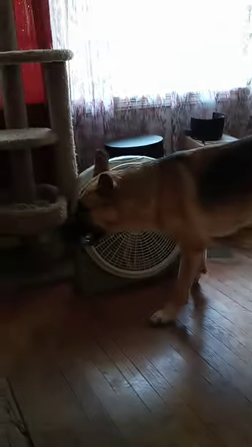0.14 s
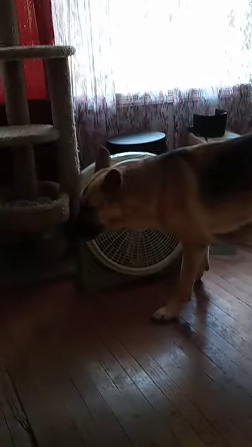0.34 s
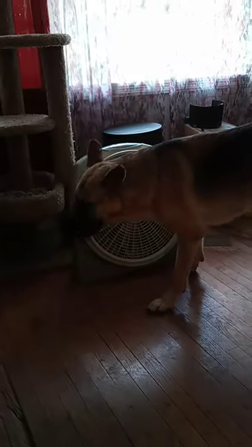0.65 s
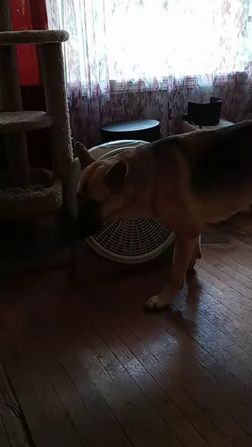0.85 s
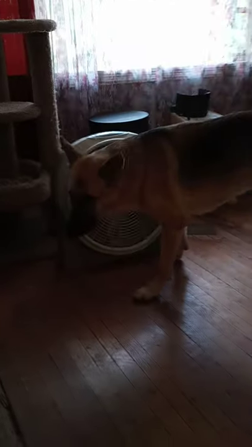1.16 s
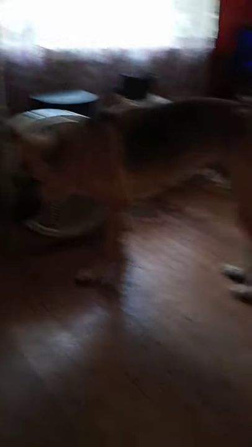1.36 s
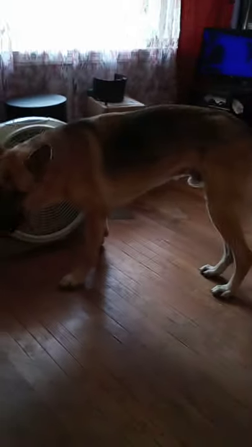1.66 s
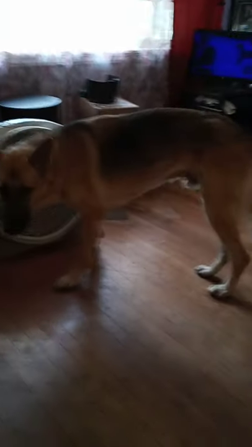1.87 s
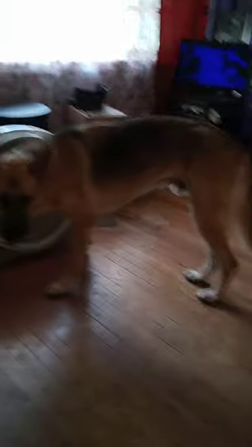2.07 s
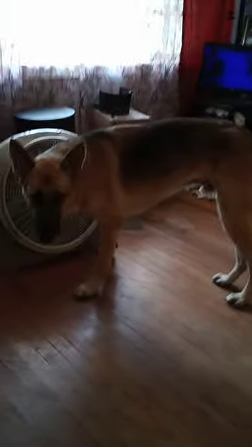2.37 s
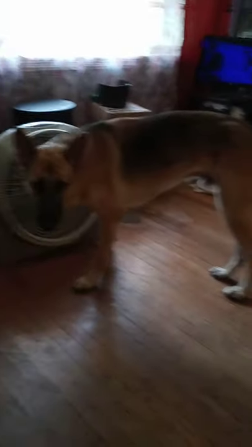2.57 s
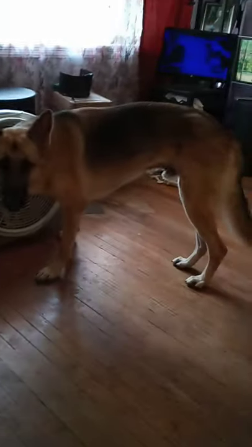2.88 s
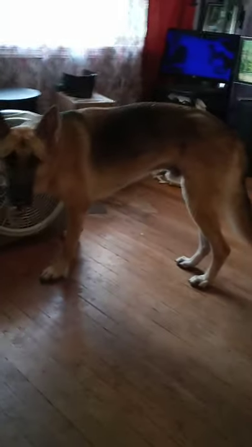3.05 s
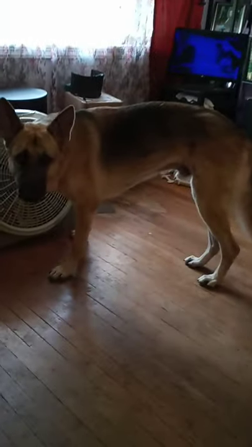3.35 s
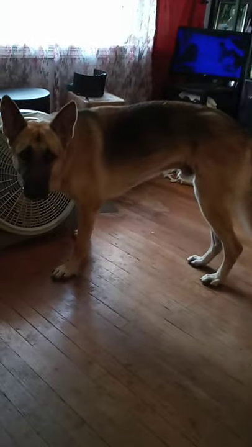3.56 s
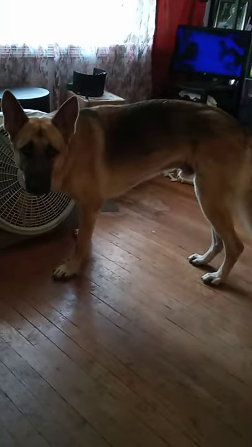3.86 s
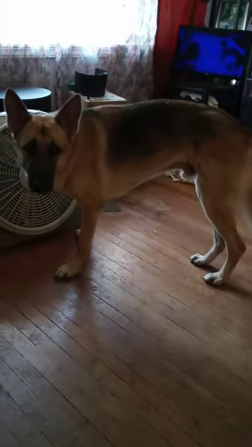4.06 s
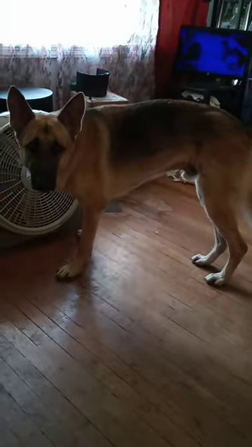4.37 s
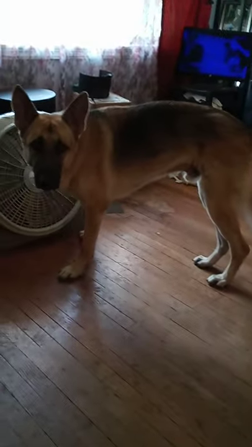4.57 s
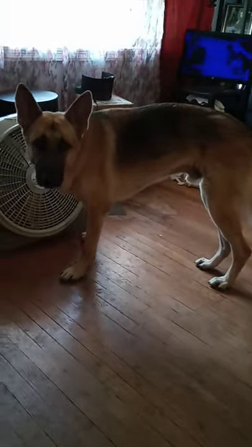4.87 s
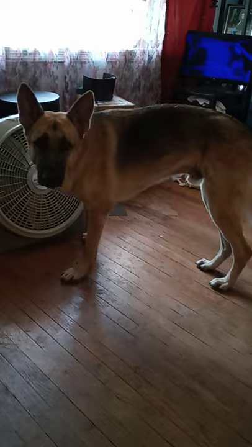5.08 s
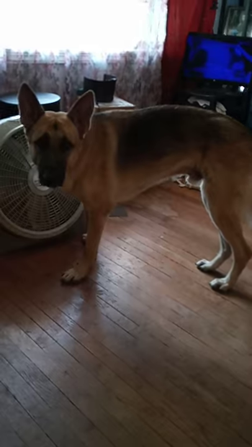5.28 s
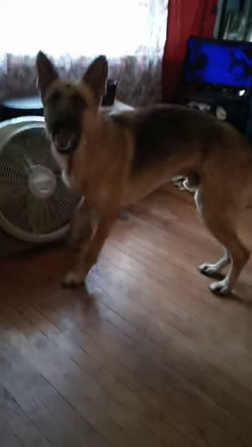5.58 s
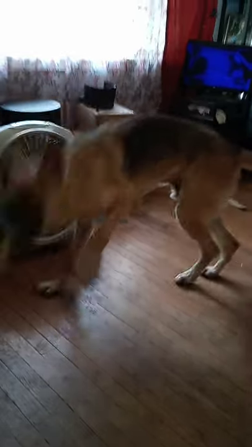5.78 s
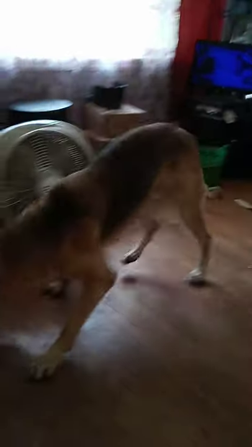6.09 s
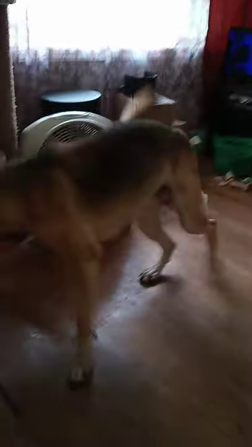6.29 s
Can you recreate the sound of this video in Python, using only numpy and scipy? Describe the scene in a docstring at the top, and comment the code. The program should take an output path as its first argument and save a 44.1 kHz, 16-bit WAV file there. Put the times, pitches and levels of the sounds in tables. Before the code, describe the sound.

A large dog moves on a hardwood floor in a small, lively room, heard through a phone microphone over a low household rumble, faint hiss and a soft, swelling rustle. Sharp claw clicks come in quick clusters at about 0.4 and 0.8 seconds. Lighter taps, scuffs and faint pad rubs follow between 1 and 2.7 seconds. At about 2.8 seconds something like a geared plastic toy stutters twice, then whirs with a raspy buzz until 3.5 seconds, speeding up and running down. A couple of light taps and a soft step come near 3.8 seconds, then a lull. The toy gives very short bursts at 5.4 and 5.8 seconds. Just after 6 seconds the dog pounces: loud paw thumps make the boards boom, with sharp claw clicks, followed by smaller thumps and a scuff around 6.3 seconds as the rustle grows.

```python
"""Dog and geared toy on a hardwood floor

A large dog shifts about in a small, lively room, heard through a phone microphone. Its claws click and
scuff on the boards, its pads rub, and its paws thump the floor as it pounces. Something like a geared
plastic toy whirs in one long run and a few short bursts. A low household rumble, a faint hiss and a
soft, swelling rustle lie underneath."""
import sys
import numpy as np
from scipy import signal
from scipy.fft import rfft, irfft
from scipy.io import wavfile
from scipy.ndimage import uniform_filter1d

SR = 44100
rng = np.random.default_rng(int(sys.argv[2]) if len(sys.argv) > 2 else 0)


def inscribe(sig):
    """Save sig as 16-bit PCM at rate SR to the path in sys.argv[1].

    A 1-D sig is mono; a 2-D sig holds one channel per row.
    Samples are clipped to [-1, 1] before scaling.
    """
    pcm = np.round(np.clip(np.atleast_2d(sig).T, -1, 1) * 32767)
    wavfile.write(sys.argv[1], SR, pcm.astype(np.int16))


N = 283563
TIME = np.arange(N) / SR
# Claws striking the boards. Each row: start in seconds, attack level in dB, low knock in dB,
# high snap in dB.
CLAW_STRIKES = [(0.3608, -17.5, -17, 4), (0.3911, -20, -10, 10), (0.428, -25, 6.5, 5),
                (.7507, -39, -12, 9.5), (0.7885, -20, 2, 10), (.802, -35, 14, -1), (1.281, -30.5, 6, -2),
                (1.3, -38.5, 11, -12), (1.658, -40.5, -2, -10), (1.671, -37, -18, -2), (1.734, -44, -9, 16),
                (1.754, -39.5, -5, 30), (2.2421, -25, -40, 26), (2.283, -34.5, 9, 31),
                (2.304, -40.5, -13, 13), (2.6887, -39, -15, 28), (2.7295, -35.5, -8, 16),
                (3.823, -39, -30, -5), (3.8724, -37.5, -1, -22), (5.778, -36, 12, -16), (6.029, -18, 15, 5),
                (6.054, -25.5, 28.5, -30), (6.2833, -34.5, 28, 30), (6.36, -25.5, 10.5, -30)]


def claw_clicks(walls, chatter_t60=0.022, tick=2.4, chatter=0.58, absorbed_db=-7):
    """A hard claw tip strikes and chatters for a moment; the boards ring, and a few pings linger."""
    # High modes of the boards. Each row: frequency in Hz, relative level in dB, t60 in seconds.
    tap_modes = [(860, 13, 0.035), (1040, 8, 0.035), (1640, 14, 0.26), (2146, 7.5, 0.12),
                 (2243, 11.5, 0.17), (3090, 10, 0.18), (3800, 8, .03), (4030, 6, 0.019), (6820, 0, 0.053),
                 (7100, -14, 0.07)]
    # Small ringing ticks. Each row: start in seconds, frequency in Hz, level in dB, t60 in seconds.
    pings = [(1.29, 588, -54, 0.46), (3.53, 560, -57, 1), (3.824, 2630, -43, 0.59), (3.825, 4070, -47, 0.2),
             (3.901, 1136, -55, 0.2)]
    out, t = np.zeros(N), TIME[:len(walls)]
    attack_samples = SR // 500  # about 2 ms
    for start, db, knock_db, snap_db in CLAW_STRIKES:
        contact = rng.standard_normal(len(t)) * fade(t, chatter_t60)
        contact[0] += tick
        direct = unit_energy(convolve(contact, tap_response(knock_db, snap_db)))
        # the strike and its chatter both reach the walls, which swallow the top
        echo = convolve(walls, tap_response(knock_db, snap_db + absorbed_db))
        tail = unit_energy(echo + chatter * convolve(echo, unit_energy(contact)))
        room_gain = undb(5.5 + 0.17 * knock_db)  # more knock, more reverberation
        add(out, start, undb(db) * np.sqrt(attack_samples) * (direct + room_gain * tail))
    out = resonate(out, tap_modes, ring_db=0.5)
    for start, hz, db, t60 in pings:
        add(out, start, undb(db) * np.sin(2 * np.pi * hz * t) * fade(t, t60))
    return out


def tap_response(knock_db, snap_db=0):
    """Colour of a hard contact with the boards, with more or less low knock and high snap."""
    # Spectrum of claw on wood. Each row: frequency in Hz, relative level in dB.
    claw_colour = [(300, -19), (700, -24), (1100, -18.5), (1750, -7), (2400, -2), (3000, -3), (4000, -2.5),
                   (5200, -12), (7100, -2.5), (8500, -7), (10200, -12.5), (12000, -23.5), (15500, -21.5)]
    hz, db = np.transpose(claw_colour)
    knock_share = lookup([(1600, 0.7), (2500, 0.086)], hz)
    snap_share = lookup([(6500, 0.31), (13000, 0.73)], hz)
    return response(np.c_[hz, db + knock_share * knock_db + snap_share * snap_db])


def paw_thumps(walls, gain_db=31, room_db=-3, thud_db=-4):
    """Soft pads push on the boards, which boom in their low modes over a dull thud."""
    # The dog's weight landing. Each row: start in seconds, relative level in dB, contact in seconds.
    landings = [(.43, -53, .0005), (1.283, -44.5, 0.00028), (1.47, -48.5, 0.00039), (2.331, -50, 0.00066),
                (3.815, -43, 0.0044), (5.846, -35.5, 0.0043), (6.055, -19, 0.0017), (6.071, -19, 0.0027),
                (6.284, -27.5, 0.015), (6.356, -38, 0.0069)]
    # Low modes of the boards. Each row: frequency in Hz, relative level in dB, t60 in seconds.
    board_modes = [(82, -22.5, 0.21), (133.5, -5, 0.15), (158.2, -2.5, 0.42), (182, -3.5, 0.088),
                   (233, -4, 0.17), (278.7, -0.5, 0.26), (350.8, -4, 0.23), (480, -8, 0.1)]
    out, t = np.zeros(N), TIME[:SR // 2]
    boom = unit_energy(sum((-1) ** k * undb(db) * np.sin(2 * np.pi * hz * t) * fade(t, t60)
                           for k, (hz, db, t60) in enumerate(board_modes)))
    thud_colour = response([(40, -14.5), (100, -2), (280, 3.5), (500, 0.5), (800, -13.5),
                            (2000, -25), (6000, -77)])
    for start, db, contact_s in landings:
        thud = unit_energy(convolve(rng.standard_normal(len(t)) * fade(t, t60=0.36), thud_colour))
        body = boom + undb(thud_db) * thud
        push = np.exp(-np.pi * t / contact_s)  # a longer contact sounds duller
        add(out, start, undb(db + gain_db) * unit_energy(convolve(body, push)))
    return out + undb(room_db) * convolve(out, walls)


def toy_gears(walls, teeth=8, mesh_hz=76.8, slip_range_hz=4.5, slip_s=0.0015, buzz_db=-4, rasp_db=-4):
    """Teeth tick in the same uneven pattern on every turn; when they slip, the buzz turns to a rasp."""
    # Colour of the plastic shell. Each row: frequency in Hz, relative level in dB.
    shell_colour = [(80, -14.5), (150, -10), (300, -5.5), (450, -8.5), (650, -8), (1000, -10), (1500, -8.5),
                    (2100, -1), (3100, -4.5), (3900, -2), (5500, -7.5), (7300, -1), (8700, -5.5),
                    (10000, -12.5), (12500, -17), (15500, -18.5)]
    # Resonances of the shell. Each row: frequency in Hz, relative level in dB, t60 in seconds.
    shell_modes = [(472, 1, .07), (940, 1, .07), (1020, 2, .07), (1831, 5, .15), (2048, 0, .1),
                   (2113, 1, .12), (2275, 4, .07), (2613, 4, .12), (2907, 2, .1), (3620, 0, .025),
                   (4108, 3, .06), (4950, 3, .025), (5102, 2, .1), (5660, -3, .02), (6390, -1, .03),
                   (7095, 9, .4), (7168, 14.5, .3), (7200, 4, .08), (7410, 2, .04), (8420, 2, .02),
                   (11500, 6, .015), (13750, 4, .02), (14150, 3, .02), (14700, 2, .03)]
    speed, drive = gear_motion(mesh_hz)
    slip = np.clip((mesh_hz - speed) / slip_range_hz, 0, 1)  # the teeth mesh cleanly above mesh_hz
    turns = np.cumsum(speed) / SR
    tooth_place = rng.random(teeth)
    tooth_force = undb(2 * rng.standard_normal(teeth))
    tooth_force[0] *= 3.7  # one tooth catches harder than the rest
    tick_s = np.interp(np.arange(int(turns[-1]))[:, None] + tooth_place, turns, TIME)
    tick_s += slip_s * np.interp(tick_s, TIME, slip) * rng.standard_normal(tick_s.shape)
    tick_force = tooth_force * undb(0.5 * rng.standard_normal(tick_s.shape))
    tick_index = np.clip(tick_s * SR, 0, N - 1).astype(int)
    ticks = np.bincount(tick_index.ravel(), tick_force.ravel(), N)
    # the ticks carry the pitch in the lows and mids
    buzz = butterworth(unit(ticks - ticks.mean()), 1, 4500, "low") * np.sqrt(2)
    # each tooth scrapes as it lets go, which fills the treble
    scrape = unit(convolve(ticks, fade(TIME[:SR // 50], t60=0.024))) * rng.standard_normal(N)
    rasp = butterworth(scrape, 2, 2600, "high")
    whir = drive * (undb(buzz_db) * buzz + undb(rasp_db) * rasp)
    coloured = convolve(whir, response(shell_colour))
    return in_room(resonate(coloured, shell_modes, ring_db=2), walls)


def gear_motion(mesh_hz, peak_share=0.41, sag_hz_per_s2=100, db_per_hz=0.16,
                attack_s=0.0086, release_s=0.012):
    """Speed and strength of the gears: each run spins up and runs down in an arch, louder when faster."""
    # Runs of the toy. Each row: start and length in seconds, relative level in dB,
    # top speed in turns per second.
    runs = [(2.765, .03, -27, 58.2), (2.826, 0.029, -25, 64.05), (2.874, .618, -25.5, 78.88),
            (5.37, 0.031, -23.5, 62.02), (5.809, 0.13, -25, 67.77)]
    speed, drive = np.full(N, float(mesh_hz)), np.zeros(N)
    for start, length, db, top_hz in runs:
        t = TIME - start
        gate = np.clip(t / attack_s, 0, 1) * np.clip((length - t) / release_s + 0.5, 0, 1)
        sag_hz = sag_hz_per_s2 * (t - peak_share * length) ** 2
        speed = np.where(gate > 0, top_hz - sag_hz, speed)
        drive += gate * undb(db - db_per_hz * sag_hz)
    return speed, drive


def claw_scuffs(walls, grain_db=3):
    """Sliding claws catch and slip in dense, uneven grains."""
    # Claw slides, some alone and some leading into a strike. Each row: start and length in seconds,
    # relative level in dB, knock in dB.
    slides = [(0, 0.01, -36, 11.5), (0.327, 0.047, -38.5, 0), (1.216, 0.036, -51, -2),
              (5.616, 0.089, -51.5, 15.5), (6.32, .095, -41.5, 14)]
    dry = np.zeros(N)
    grains = unit(rng.standard_normal(N) * undb(grain_db * np.minimum(rng.exponential(size=N), 5)))
    for start, length, db, knock_db in slides + claw_drags():
        slide = slide_envelope(start, length, db, taper=0.3)
        dry += convolve(slide * grains, tap_response(knock_db))
    return in_room(dry, walls)


def claw_drags(lead_s=0.046, length_s=0.098, drag_db=-48, reference_strike_db=-18.5, drag_knock_db=3):
    """A claw slides briefly as it lands; harder and heavier strikes drag more, a thin tick hardly."""
    slides = []
    for start, strike_db, knock_db, _ in CLAW_STRIKES:
        db = drag_db + 0.42 * (strike_db - reference_strike_db) + 0.13 * knock_db
        slides.append((start - lead_s, length_s, db, drag_knock_db))
    return slides


def pad_rubs(walls, width_octaves=0.59):
    """A pad rubs over the wood for a moment and rings one broad resonance."""
    # Soft rubs. Each row: start and length in seconds, centre in Hz, relative level in dB.
    rubs = [(1.008, 0.038, 1590, -56.5), (1.463, 0.027, 1100, -48.5), (2.148, 0.036, 2200, -52),
            (2.392, 0.02, 2090, -54), (5.715, 0.056, 1080, -50)]
    dry = np.zeros(N)
    for start, length, hz, db in rubs:
        edges_hz = hz * 2 ** (np.array([-0.5, 0.5]) * width_octaves)
        friction = unit(butterworth(rng.standard_normal(N), 2, edges_hz, "band"))
        dry += slide_envelope(start, length, db, taper=0.5) * friction
    return in_room(dry, walls)


def room_tone(rumble_db=-49.5, hiss_db=-61.5, waver_db=3, flicker_db=2.5):
    """Low household rumble, wavering low mids, a faint steady hiss and a soft, flickering rustle."""
    # Spectra of the rumble and the hiss. Each row: frequency in Hz, relative level in dB.
    rumble_colour = [(15, -51), (25, -28), (48, -10), (58, -19), (80, 4.5), (108, -4), (160, -2.5),
                     (255, -7.5), (320, -21.5), (430, -24.5), (656, -31), (1400, -36), (1820, -80)]
    hiss_colour = [(710, -42), (1200, -28), (1380, -9), (1860, -14.5), (2070, -5), (2830, -12), (3080, -6),
                   (3980, -3), (4480, -7.5), (5310, -21), (7020, -6), (10100, -15.5), (15500, -17.5)]
    low_mids = np.zeros(N)
    for hz, db in [(330, -0.5), (430, -2), (540, -9.5)]:
        band = [(hz * 0.6, -40), (hz * 0.9, 0), (hz * 1.1, 0), (hz * 1.4, -40), (hz * 4, -90)]
        low_mids += coloured_noise(band) * undb(db + waver_db * waver(count=70))
    rustle = coloured_noise([(1000, -24), (1800, -7), (2600, 5), (4000, -3.5), (5200, -21.5),
                             (7000, -14), (11000, -22)])
    rustle *= undb(flicker_db * waver(count=320))
    rustle_gain, mids_gain = swell_gains()
    rumble = coloured_noise(rumble_colour) * undb(rumble_db)
    hiss = coloured_noise(hiss_colour) * undb(hiss_db)
    return rumble + low_mids * mids_gain + hiss + rustle * rustle_gain


def swell_gains(rustle_rest_db=-69, mids_rest_db=-74.5):
    """Gains of the rustle and of the low mids: a resting level with bell-shaped swells on top."""
    # Soft swells. Each row: middle and half width in seconds, rustle gain in dB, low-mid gain in dB.
    swells = [(1.15, 0.82, -59, -63), (2.549, 0.2, -61, -67.5), (3.7, 0.47, -58, -68.5),
              (4.56, .12, -55, -72), (4.95, 0.35, -60, -64), (6.3, 0.52, -50, -52.5)]
    rustle_power, mids_power = undb(rustle_rest_db) ** 2, undb(mids_rest_db) ** 2
    for middle, half_width, rustle_db, mids_db in swells:
        bell = np.exp(-((TIME - middle) / half_width) ** 2)
        rustle_power += bell * undb(rustle_db) ** 2
        mids_power += bell * undb(mids_db) ** 2
    return np.sqrt(rustle_power), np.sqrt(mids_power)


def room_response(first_echo_s=0.0041, build_s=0.0012, echo_db=2, blur_s=0.037):
    """Distinct early echoes off the near walls thicken into a tail whose treble dies first."""
    # Decay of the room. Each row: frequency in Hz, t60 in seconds.
    decay = [(120, 0.46), (500, 0.31), (1400, 0.4), (3700, 0.39), (7500, .4), (14000, 0.24)]
    t = TIME[:SR * 3 // 4]
    echoes = rng.standard_normal(len(t))
    echoes *= undb(echo_db * np.minimum(rng.exponential(size=len(t)), 5) * np.exp(-t / blur_s))
    echoes /= np.sqrt(uniform_filter1d(echoes ** 2, size=600))
    spectrum, hz = rfft(echoes), np.fft.rfftfreq(len(t), 1 / SR)
    centres = np.transpose(decay)[0]
    tail = np.zeros(len(t))
    for (_, t60), share in zip(decay, np.eye(len(decay))):
        band = irfft(spectrum * lookup(np.c_[centres, share], hz), len(t))
        tail += band * fade(t, t60)
    onset = 1 - np.exp(-np.maximum(t - first_echo_s, 0) / build_s)
    return unit_energy(tail * onset)


def in_room(x, walls, direct_db=-4):
    """What reaches the microphone: the direct sound and its reverberation."""
    return undb(direct_db) * x + convolve(x, walls)


def slide_envelope(start, length, db, taper):
    """Strength of one slide, with soft ends and silence around it."""
    envelope = np.zeros(N)
    add(envelope, start, undb(db) * signal.windows.tukey(int(length * SR), taper))
    return envelope


def resonate(x, modes, ring_db):
    """Add the ringing of (Hz, dB, t60) modes that x excites."""
    t = TIME[:SR // 2]
    ring = sum(undb(db) * np.cos(2 * np.pi * hz * t) * fade(t, t60) / fade(t, t60).sum()
               for hz, db, t60 in modes)
    return x + undb(ring_db) * convolve(x, ring)


def coloured_noise(points):
    """Steady noise of rms 1 with the given (Hz, dB) spectrum."""
    return unit(convolve(rng.standard_normal(N), response(points, size=16384)))


def waver(count):
    """A random curve through count points, with a spread near 1."""
    return np.interp(TIME, np.linspace(0, TIME[-1], count), rng.standard_normal(count))


def response(points, size=2048):
    """Minimum-phase impulse response with the given (Hz, dB) spectrum."""
    gain = undb(lookup(points, np.fft.rfftfreq(size, 1 / SR)))
    cepstrum = irfft(np.log(gain))
    cepstrum[1:size // 2] *= 2
    cepstrum[size // 2 + 1:] = 0
    return unit_energy(irfft(np.exp(rfft(cepstrum))))


def lookup(points, hz):
    """Read (Hz, value) points on a log-frequency axis."""
    point_hz, value = np.transpose(points)
    return np.interp(np.log(np.maximum(hz, 1)), np.log(point_hz), value)


def butterworth(x, order, hz, kind):
    """Low-, high- or band-pass x."""
    return signal.sosfilt(signal.butter(order, hz, kind, fs=SR, output="sos"), x)


def convolve(x, h):
    """Pass x through the response h."""
    return signal.fftconvolve(x, h)[:len(x)]


def fade(t, t60):
    """Exponential decay that loses 60 dB in t60."""
    return np.exp(-np.log(1000) * t / t60)


def add(out, start, x):
    """Mix x into out from start seconds on."""
    i = max(int(start * SR), 0)
    out[i:i + len(x)] += x[:max(N - i, 0)]


def undb(db):
    """Decibels to gain."""
    return 10 ** (np.asarray(db) / 20)


def unit(x):
    """Scale to rms 1."""
    return x / np.sqrt(np.mean(x ** 2))


def unit_energy(x):
    """Scale so that the squares sum to 1."""
    return x / np.sqrt(np.sum(x ** 2))


def scene():
    """Dog and toy share one room, heard in mono over its room tone."""
    walls = room_response()
    dog = claw_clicks(walls) + claw_scuffs(walls) + paw_thumps(walls)
    return (dog + toy_gears(walls) + pad_rubs(walls) + room_tone())[None]


def record(dry, bass_hz=50, top_hz=15750):
    """The phone microphone drops the deepest bass and cuts the top steeply."""
    thinned = butterworth(dry, 3, bass_hz, "high")
    return signal.sosfilt(signal.ellip(12, 0.2, 80, top_hz, fs=SR, output="sos"), thinned)


dry = scene()
out = record(dry)
inscribe(out)
```